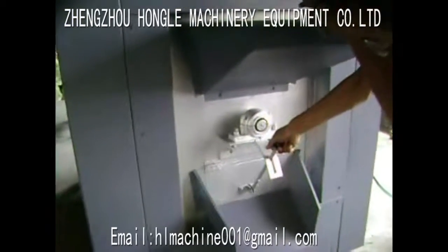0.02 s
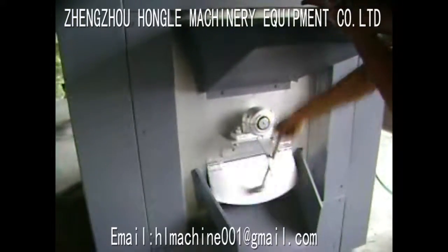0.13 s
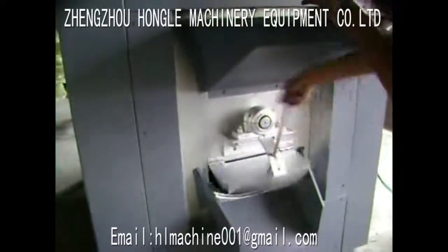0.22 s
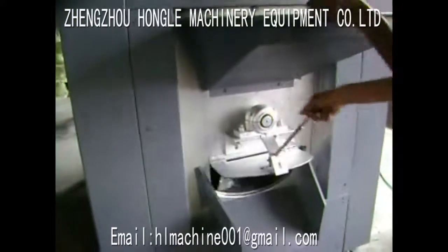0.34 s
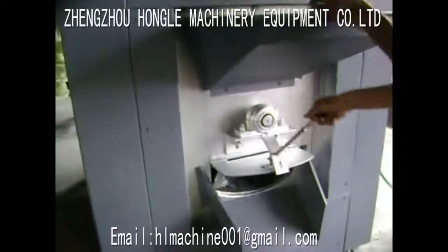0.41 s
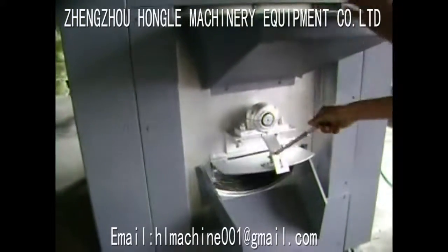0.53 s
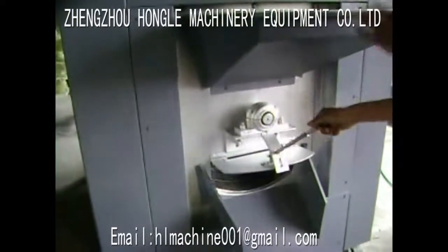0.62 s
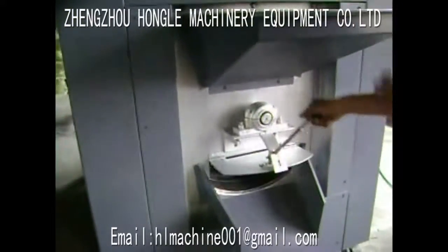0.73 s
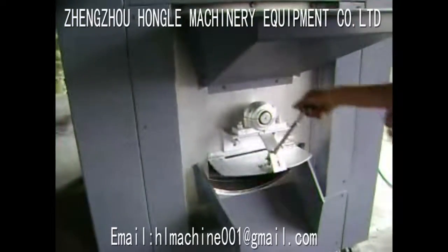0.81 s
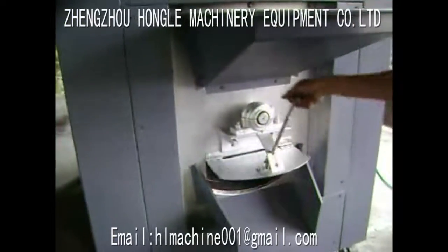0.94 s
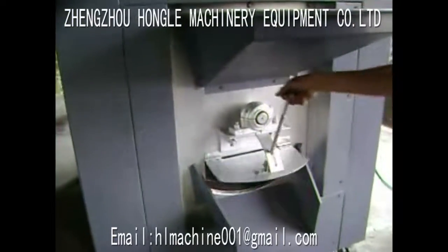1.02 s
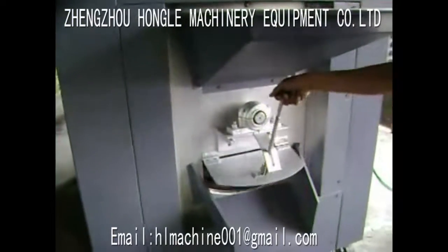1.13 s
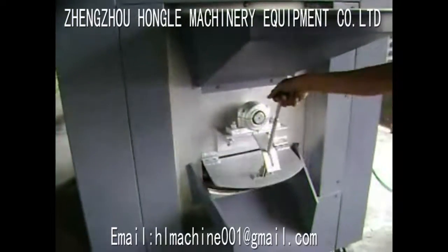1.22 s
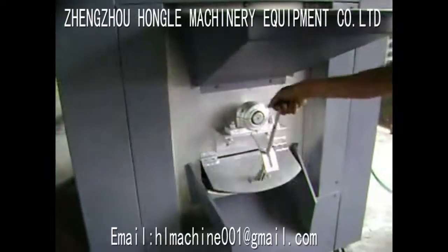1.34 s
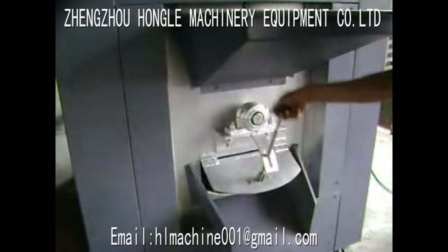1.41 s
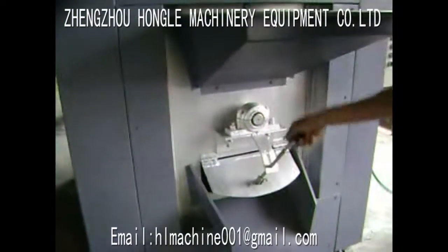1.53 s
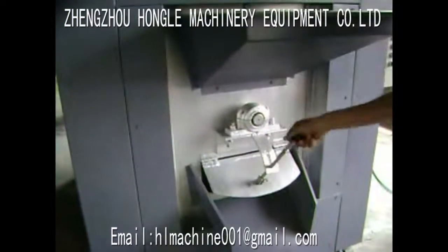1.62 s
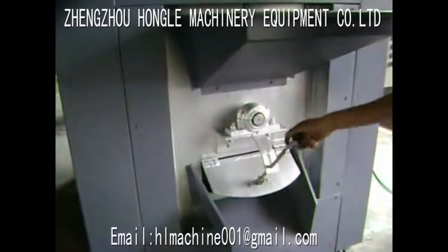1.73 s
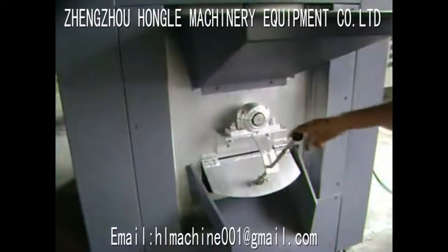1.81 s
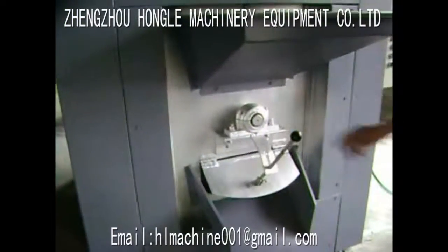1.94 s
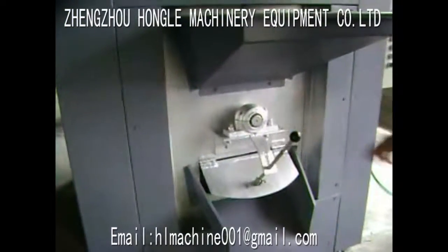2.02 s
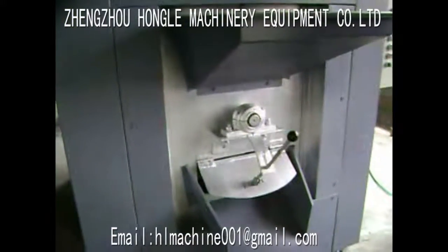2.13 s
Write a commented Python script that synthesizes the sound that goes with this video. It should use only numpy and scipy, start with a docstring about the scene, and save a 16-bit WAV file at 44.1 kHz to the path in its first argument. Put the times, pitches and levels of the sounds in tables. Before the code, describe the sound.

Loud steel discharge door clatters open with a brief groan and rasp, then scrapes back with a low judder, bangs shut and its latch and lever knock; nuts tumble in a humming drum, close rough microphone.

```python
"""A steel discharge door is wrenched open with a clatter and a groan, then scrapes and juders back,
bangs shut, and its latch and lever knock home. Blows are noise cracks, decaying noise clangs and
dying modes; rubbing is random slips through the door's modes. Behind it a drum nut roaster runs:
random clicks for the tumbling nuts, filtered noise for rumble, wandering sines for a bearing whine.
The near microphone has a narrow band and clips on the loudest peaks."""
import sys
import numpy as np
from scipy import signal
from scipy.fft import rfft, irfft
from scipy.io import wavfile
from scipy.ndimage import uniform_filter1d

SR = 44100
rng = np.random.default_rng(int(sys.argv[2]) if len(sys.argv) > 2 else 0)


def wrap_up_sound(samples):
    """Save the sound to the file named by the first command line argument, as 16-bit audio."""
    columns = np.atleast_2d(samples).T
    # keep every value between -1 and 1, then stretch to whole-number steps
    tamed = np.clip(columns, -1, 1)
    steps = np.round(tamed * 32767).astype(np.int16)
    wavfile.write(sys.argv[1], SR, steps)


N = 97020
T = np.arange(N) / SR  # seconds

# Modes of the door and chute, struck or rubbed. Each row: pitch in Hz, level in dB, t60 in seconds.
DOOR_MODES = [(129, -21, .5), (258, -19, .45), (369, -17, .35), (529, -9, .35), (551, -12, .35),
              (637, -10, .2), (682, -12, .25), (732, -9, .3), (800, -7, .3), (905, -17, .25),
              (1045, -13, .2), (1083, -12, .22), (1152, -13, .18), (1236, -9, .24), (1354, -15, .22)]


def amp(db):
    """Turns decibels into gain."""
    return 10 ** (np.asarray(db) / 20)


def unit(x):
    """Scales a sound to rms 1."""
    return x / np.sqrt(np.mean(x ** 2) + 1e-20)


def read(points, hz):
    """Reads a table on a log-frequency axis."""
    f, value = np.transpose(points)
    return np.interp(np.log(hz + 1), np.log(f + 1), value)


def curve(points, axis=1):
    """Reads one column of a control curve at every sample."""
    rows = np.array(points)
    return np.interp(T, rows[:, 0], rows[:, axis])


def during(points):
    """Gate with soft edges, open for the span of a control curve."""
    is_open = (T > points[0][0]) & (T < points[-1][0])
    return uniform_filter1d(1. * is_open, size=200)


def add(mix, start_s, sound):
    """Mixes a sound in at a time, cut off at the end of the scene."""
    part = mix[round(start_s * SR):][:len(sound)]
    part += sound[:len(part)]


def colour(x, points):
    """Gives a sound a spectrum, at rms 1."""
    hz = np.fft.rfftfreq(len(x), 1 / SR)
    return unit(irfft(rfft(x) * amp(read(points, hz)), len(x)))


def drift(rate_hz):
    """Random wander of rms 1: noise low-passed at the given rate."""
    hz = np.fft.rfftfreq(N, 1 / SR)
    return unit(irfft(rfft(rng.standard_normal(N)) / (1 + (hz / rate_hz) ** 4), N))


def resonate(x, hz, width_hz):
    """One resonance, a single complex pole, at rms 1."""
    pole = np.exp((-np.pi * abs(width_hz) + 2j * np.pi * hz) / SR)
    return unit(signal.lfilter([1], [1, -pole], x).real)


def patter(per_s, spread_db):
    """Random clicks of either sign, a few of them large."""
    size = amp(spread_db * np.minimum(rng.exponential(1, N), 4))
    sign = rng.choice([-1, 1], N)
    return size * sign * (rng.random(N) < per_s / SR)


def ring(modes, t):
    """Dying sine modes of a struck part, each starting at a random phase."""
    sound = 0
    for hz, db, t60 in modes:
        sound = sound + amp(db - 60 * t / t60) * np.sin(2 * np.pi * (hz * t + rng.random()))
    return sound


def machine():
    """Fan and drive rumble as coloured noise, under a bearing whine of sines wandering in pitch."""
    # Rumble colour. Each row: frequency in Hz, relative level in dB per Hz.
    rumble_colour = [(20, -15.5), (50, -7.5), (80, -12.5), (130, -5.5), (200, -6.5), (450, -19), (700, -3),
                     (1200, -10), (1600, -13), (2300, -11), (3200, -14.5), (5200, -22.5), (7000, -30)]
    # Swell of the whole whine. Each row: time in seconds, level in dB.
    whine_level = [(0, -38), (.15, -32), (.6, -37), (.8, -34), (1.0, -26), (1.12, -29), (1.5, -29),
                   (1.9, -31), (2.2, -36)]
    # Lines of the whine. Each row: pitch in Hz, relative level in dB, rms pitch wander in Hz.
    whine_lines = [(2276, 0, .6), (2142, -7, .6), (2408, -14, 3)]
    rumble = amp(-26 + .5 * drift(4)) * colour(rng.standard_normal(N), rumble_colour)
    whine = 0
    for hz, db, wander_hz in whine_lines:
        level = amp(db + 1.1 * drift(7))  # wavers by 1.1 dB rms
        turns = np.cumsum(hz + wander_hz * drift(27)) / SR
        whine = whine + level * np.sin(2 * np.pi * turns)
    return rumble + np.sqrt(2) * amp(curve(whine_level)) * whine


def nuts():
    """Nuts strike the drum wall as random clicks, which also keep drum and housing modes ringing."""
    # Colour of the strikes. Each row: frequency in Hz, relative level in dB per Hz.
    strike_colour = [(100, -27), (450, -1), (700, -8.5), (1200, 5.5), (1550, -7), (2300, 7.5), (3200, -4),
                     (4500, -4), (7000, -13.5)]
    # Swell of the tumbling. Each row: time in seconds, level in dB.
    tumble_level = [(0, -69), (.2, -31.5), (.45, -24.5), (.62, -28), (.82, -30), (1.0, -25.5), (1.2, -22.5),
                    (1.42, -23), (1.6, -24.5), (1.75, -23), (1.95, -27), (2.2, -31.5)]
    # Drum and housing resonances. Each row: pitch in Hz, width in Hz, level in dB.
    drum_modes = [(268, 75, -40.5), (352.7, 14, -38.5), (521.7, 8.6, -35.5), (667, 46, -35.5),
                  (754, 12, -43.5), (921, 8.3, -45.5), (1218, 20, -38.5)]
    nuts_per_s, spread_db, waver_db = 1300, 2.5, 0.72
    clicks = patter(nuts_per_s, spread_db) * amp(waver_db * drift(40))
    drum = sum(amp(db) * resonate(clicks, hz, width_hz) for hz, width_hz, db in drum_modes)
    return amp(curve(tumble_level)) * colour(clicks, strike_colour) + drum


def rubbed(slips_per_s):
    """The door's modes kept ringing by small random slips, at rms 1."""
    slips = patter(slips_per_s, 3.8)
    # Width of 5 / t60 damps each mode more than when it is struck
    return unit(sum(amp(db) * resonate(slips, hz, 5 / t60) for hz, db, t60 in DOOR_MODES))


def opening():
    """The dry hinge groans near one pitch and shakes the whole door; its edge rasps along the frame."""
    # Hinge groan. Each row: time in seconds, pitch in Hz, level in dB.
    groan_path = [(.268, 718, -18), (.295, 728, -2), (.328, 740, 1), (.36, 732, -1), (.394, 725, -3),
                  (.404, 728, -15), (.44, 731, -20), (.56, 725, -33)]
    # Steel rasping on steel. Each row: time in seconds, level in dB.
    rasp_level = [(.228, -12.5), (.245, -14), (.28, -9), (.32, -9), (.36, -16), (.41, -18.5), (.47, -26)]
    # Colour of the rasp. Each row: frequency in Hz, relative level in dB per Hz.
    rasp_colour = [(100, -23), (550, -9), (900, 3), (1600, -3.5), (2300, 0.5), (2850, -2), (3300, -7.5),
                   (4100, -4.5), (5400, -12), (7000, -26)]
    turns = np.cumsum(curve(groan_path) * (1 + 0.018 * drift(66))) / SR
    tone = amp(2.7 * drift(70)) * np.sin(2 * np.pi * turns)
    body = amp(-11) * rubbed(1500)
    groan = during(groan_path) * amp(curve(groan_path, axis=2)) * (tone + body)
    rasp = during(rasp_level) * amp(curve(rasp_level)) * colour(patter(1800, 2.46), rasp_colour)
    return groan + rasp


def closing():
    """The sliding door scrapes through its own modes and judders with a low harmonic drone."""
    # Scrape. Each row: time in seconds, level in dB.
    scrape_level = [(.98, -70), (1.09, -21.5), (1.24, -24), (1.33, -24), (1.43, -27), (1.6, -27),
                    (1.8, -50)]
    # Judder. Each row: time in seconds, fundamental in Hz, level in dB.
    judder_path = [(1.0, 127.3, -49), (1.11, 129.3, -29.5), (1.24, 130.8, -24.5), (1.315, 134, -36.5),
                   (1.385, 132, -30), (1.44, 129.4, -56), (1.53, 134.9, -40), (1.8, 132.5, -41)]
    # Relative levels in dB of the judder's harmonics, from the fundamental up.
    partials_db = [0.5, -1, -6, -25]
    turns = np.cumsum(curve(judder_path) * (1 + .012 * drift(30))) / SR
    drone = 0
    for k, db in enumerate(partials_db, 1):
        drone = drone + amp(db + 1.5 * drift(25)) * np.sin(2 * np.pi * k * turns)
    scrape = during(scrape_level) * amp(curve(scrape_level)) * rubbed(900)
    return scrape + during(judder_path) * amp(curve(judder_path, axis=2)) * drone


def latch_click():
    """One latch click: short steel modes and a crack of decaying noise."""
    # Modes of the latch. Each row: pitch in Hz, level in dB, t60 in seconds.
    latch_modes = [(2080, 0, .05), (2261, -12, .05), (2826, -5, .045), (3074, -14, .05), (4130, -10, .04),
                   (5400, -15, .025)]
    # Colour of the crack. Each row: frequency in Hz, relative level in dB per Hz.
    crack_colour = [(300, -11), (1500, 0), (2300, -10), (4200, 1), (7000, -8)]
    crack_db, crack_t60 = -8.5, 0.069  # dB, s
    t = T[:SR // 2]
    fade = amp(-60 * t / crack_t60)
    crack = amp(crack_db) * fade * colour(rng.standard_normal(len(t)), crack_colour)
    return ring(latch_modes, t) + crack


def blow(db, tilt_db, spot_hz, knock_db, ring_db):
    """A short crack, a hollow knock of the struck spot, a clang dying band by band, the door's modes."""
    # Colour of the sheet steel. Each row: frequency in Hz, relative level in dB per Hz before tilt.
    steel_colour = [(30, -32.5), (130, -7), (300, -9.5), (600, 0), (1200, -4), (1600, -11.5), (2300, 1.5),
                    (3200, -13.5), (5000, -16), (7000, -22.5)]
    # How long the clang rings. Each row: frequency in Hz, t60 in seconds.
    clang_t60 = [(100, 0.67), (300, 0.5), (600, 0.34), (1500, 0.21), (3000, .13), (6000, 0.24)]
    # Short modes of the struck spot. Each row: ratio to its pitch, relative level in dB, t60 in seconds.
    knock_modes = [(1, -1, 0.075), (.69, -10.5, .06), (0.76, -16.5, 0.04), (1.7, -7.5, 0.026)]
    tilt_from_hz, attack_s = 350, .0005
    crack_t60, crack_db, clang_db = 0.029, -3, -6.5  # s, dB, dB
    t = np.arange(32768) / SR

    tilted = []
    for hz, level in steel_colour:
        octaves = np.log2(max(hz, tilt_from_hz) / tilt_from_hz)
        tilted.append((hz, level + tilt_db * octaves))
    crack, clang = (colour(noise, tilted) for noise in rng.standard_normal((2, len(t))))
    crack = crack * amp(-60 * t / crack_t60)

    # Each frequency band of the clang fades at its own rate
    band_hz, frame_s, bands = signal.stft(clang, SR, nperseg=256)
    band_fade = amp(-60 * frame_s / read(clang_t60, band_hz)[:, None])
    clang = signal.istft(bands * band_fade, SR)[1][:len(t)]

    spot_modes = [(spot_hz * ratio, level, t60) for ratio, level, t60 in knock_modes]
    knock = amp(knock_db) * ring(spot_modes, t)
    whole_door = amp(ring_db) * ring(DOOR_MODES, t)
    sound = amp(crack_db) * crack + knock + amp(clang_db) * clang + whole_door
    return amp(db) * np.minimum(t / attack_s, 1) * sound


def door():
    """Impacts of the clatter, the bang and the lever, each struck afresh, plus the latch's clicks."""
    # Blows on the door. Each row: start in seconds, level in dB, tilt in dB per octave,
    # pitch of the struck spot in Hz, its knock in dB, ring of the whole door in dB.
    blow_list = [(0.227, -6, -1.5, 630, 4.5, 0), (0.2336, -5, 3, 500, -7, -11),
                 (.266, -1.5, -0.5, 640, 2, -12.5), (0.3129, 4, 0.5, 552, -2, -6.5),
                 (.322, -9, 0, 640, 0, -7), (.352, -7.5, -.5, 545, -3, -3),
                 (.405, -14.5, -2.5, 543, 8.5, 2.5), (.432, -12.5, -8, 533, 6.5, -0.5),
                 (.466, -17.5, -10, 570, 9, 0), (1.443, -4, -0.3, 1122, 3.5, -8),
                 (1.4523, -6.5, 1.5, 1258, 8, -1), (1.533, -19.5, -6.5, 624, 11, -2.5),
                 (1.648, -10, 1.6, 1157, 5.5, -3), (1.655, -18.5, -2, 650, 12, -10),
                 (1.663, -13, -1, 687, 4, -3)]
    # Latch clicks. Each row: start in seconds, level in dB.
    latch_hits = [(1.4824, -4.5), (1.487, -3)]
    out = np.zeros(N)
    for start_s, *row in blow_list:
        add(out, start_s, blow(*row))
    for start_s, db in latch_hits:
        add(out, start_s, amp(db) * latch_click())
    return out


def scene():
    """The running roaster and its door, as one channel."""
    return (machine() + nuts() + opening() + closing() + door())[None]


def record(dry):
    """A narrow-band microphone, overload with a slightly rounded edge, then the band limit."""
    mic_edge_hz, ceiling, rounding, band_limit_hz = 5984, 0.95, 0.34, 15400
    hz = np.fft.rfftfreq(2 * N, 1 / SR)
    mic = 1 / (1 + (hz / mic_edge_hz) ** 24) / (1 + (hz / 6800) ** 60)
    narrow = irfft(rfft(dry, 2 * N) * mic)[:, :N]
    clipped = np.clip(narrow, -ceiling, ceiling)
    # Clipping sprays energy above 6800 Hz; rounding takes away a share of it
    below = irfft(rfft(clipped, 2 * N) / (1 + (hz / 6800) ** 40))[:, :N]
    spray = clipped - below
    softened = clipped - rounding * spray
    low_pass = signal.firwin(511, band_limit_hz, window=("kaiser", 9), fs=SR)
    return signal.oaconvolve(softened, low_pass[None], "same")


dry = scene()
out = record(dry)
wrap_up_sound(out)
```